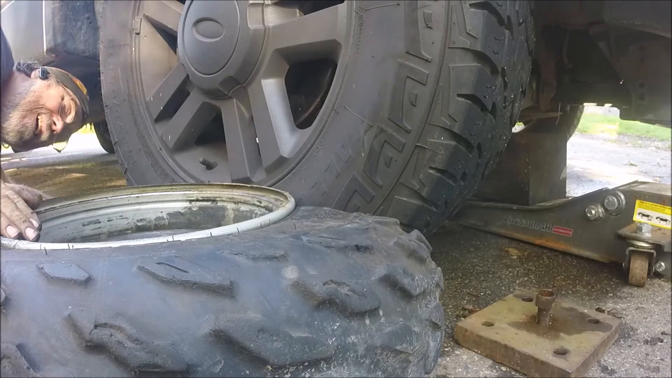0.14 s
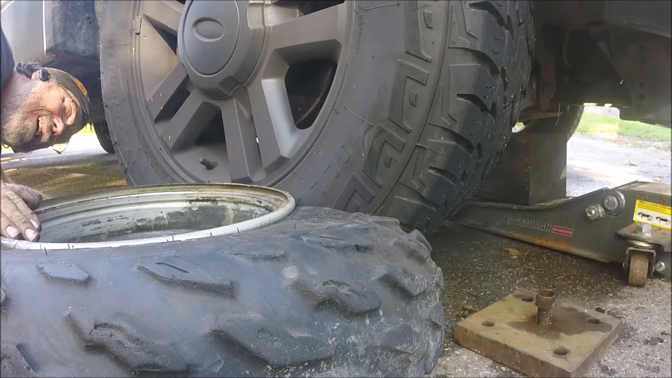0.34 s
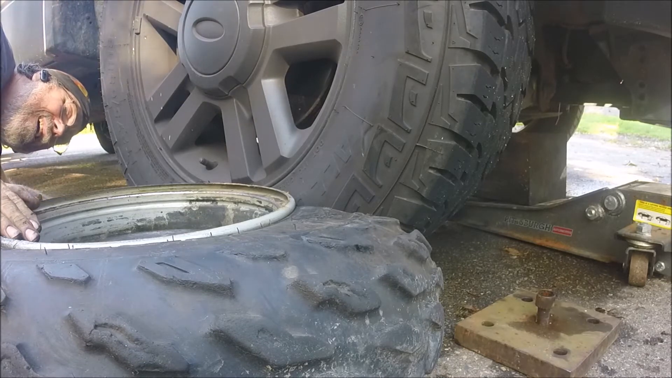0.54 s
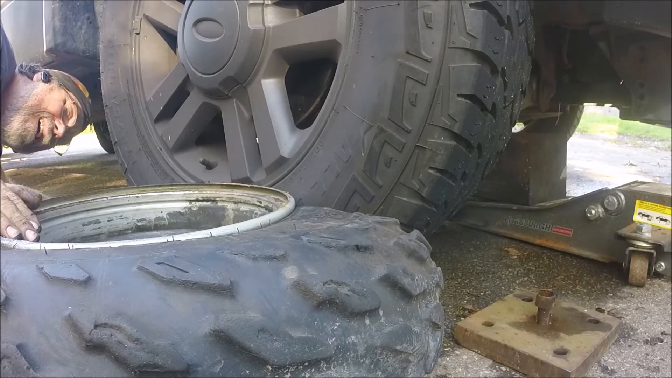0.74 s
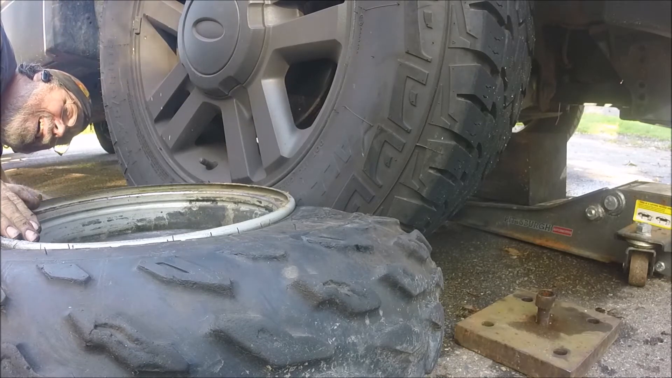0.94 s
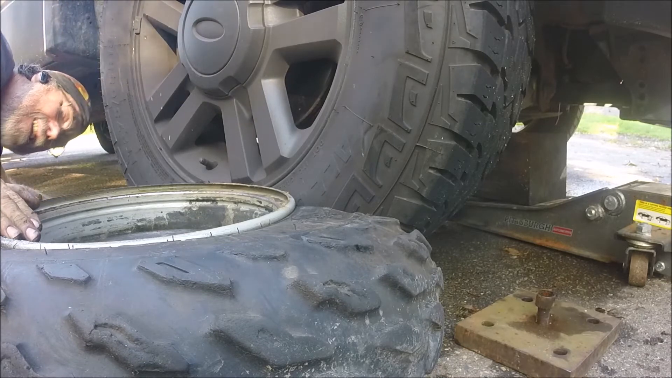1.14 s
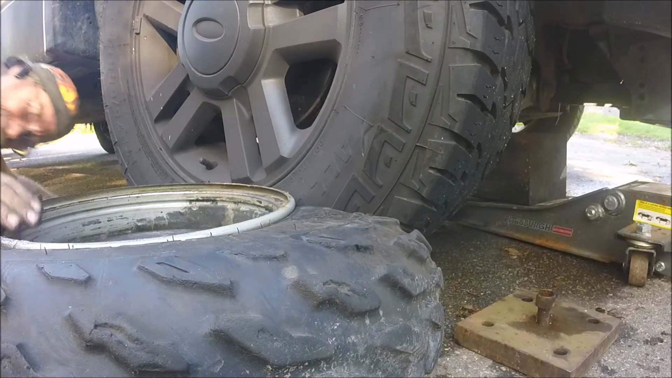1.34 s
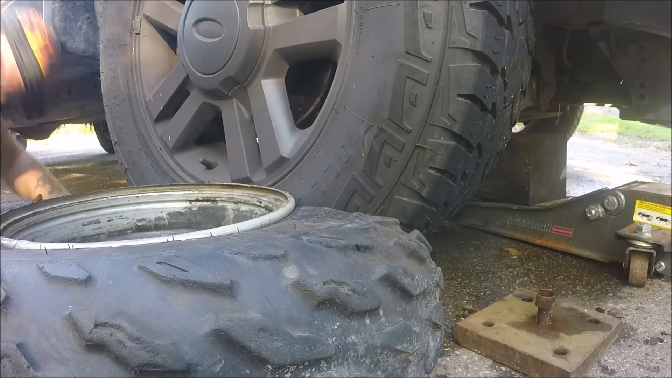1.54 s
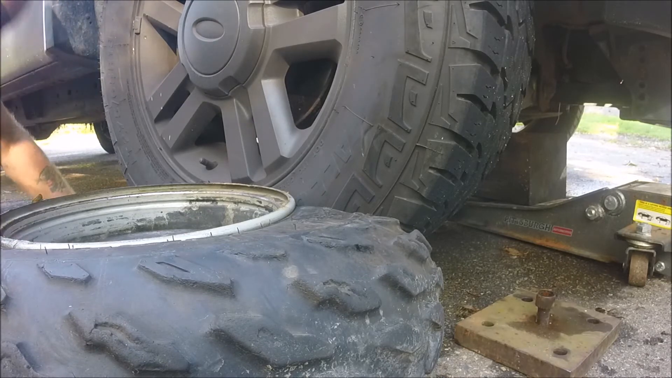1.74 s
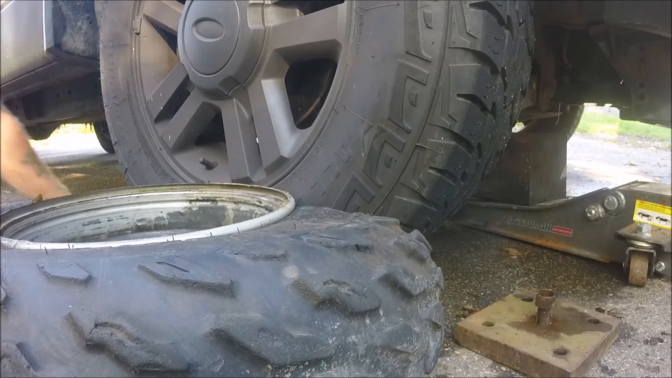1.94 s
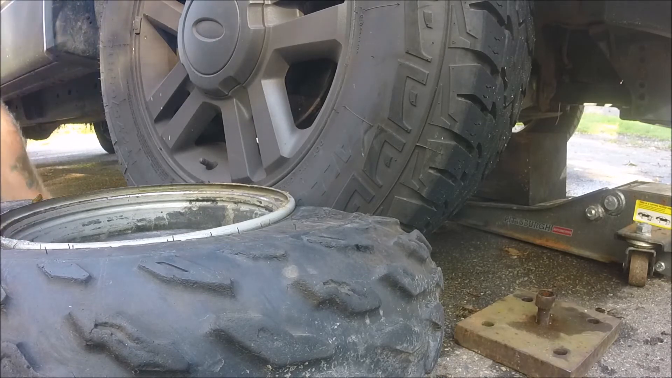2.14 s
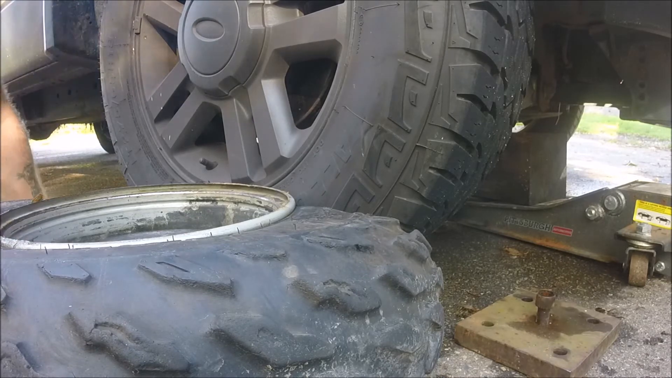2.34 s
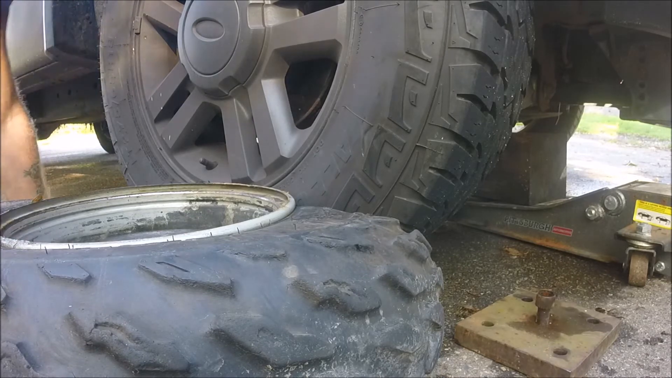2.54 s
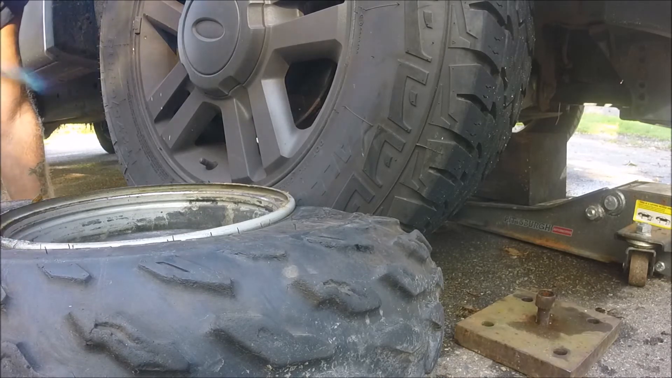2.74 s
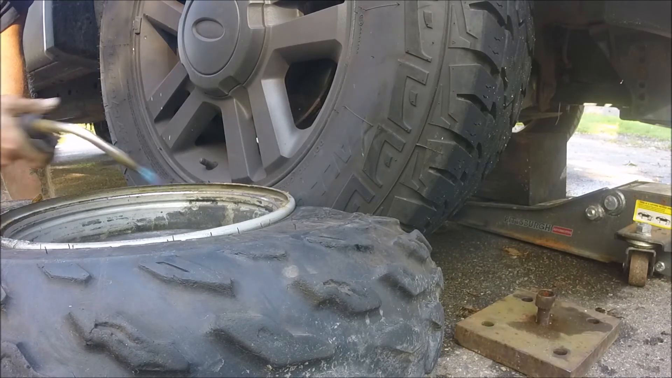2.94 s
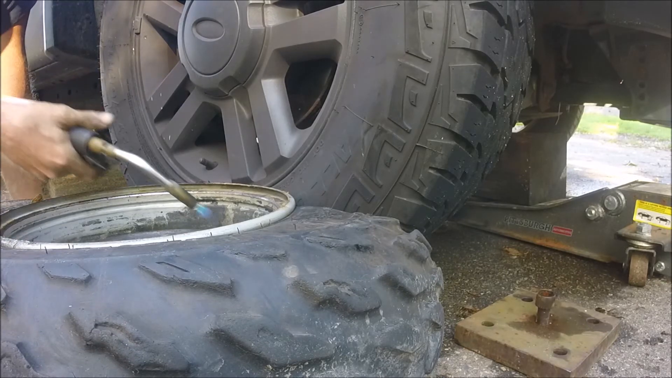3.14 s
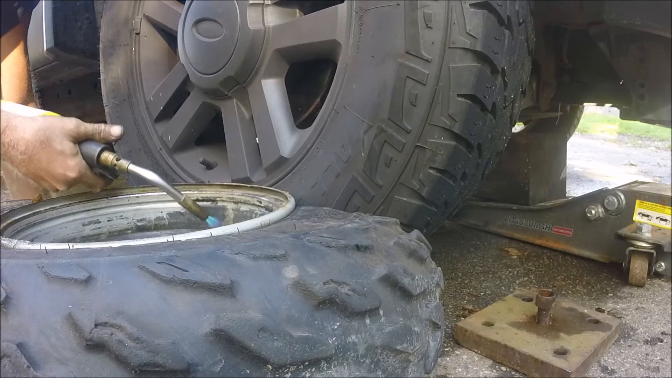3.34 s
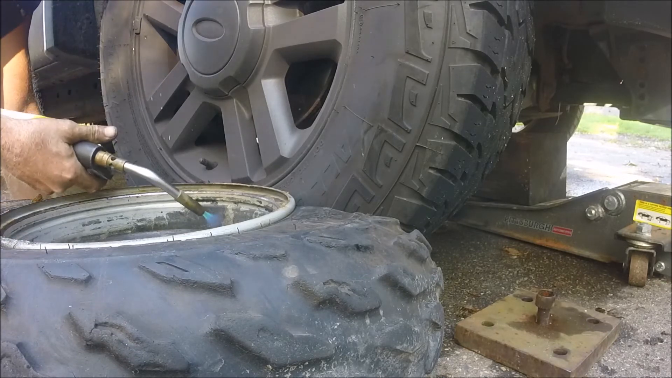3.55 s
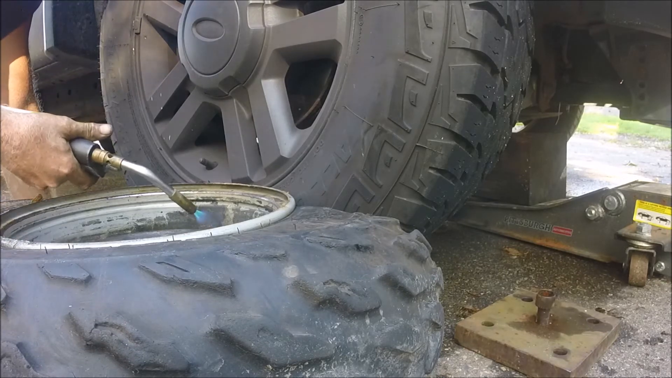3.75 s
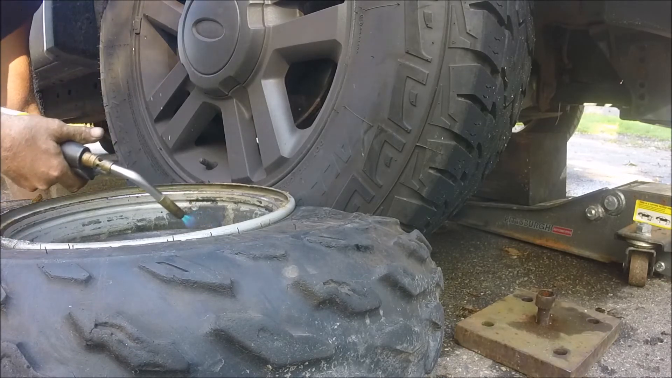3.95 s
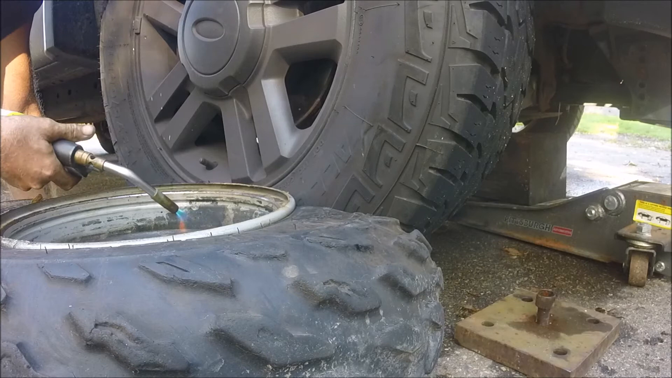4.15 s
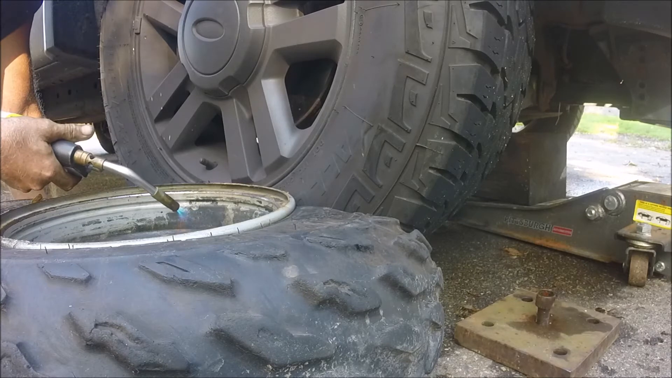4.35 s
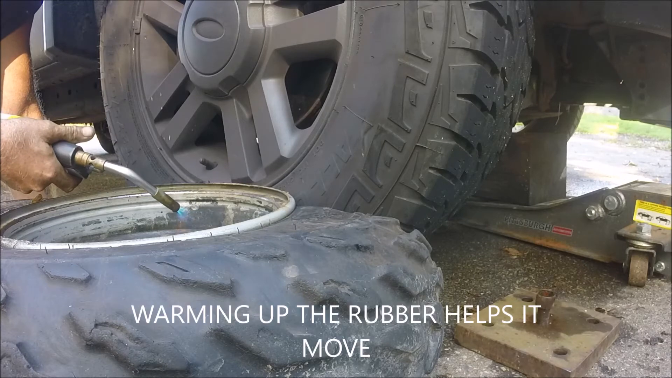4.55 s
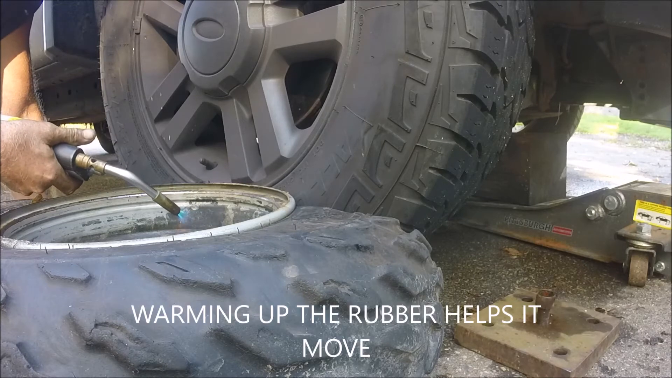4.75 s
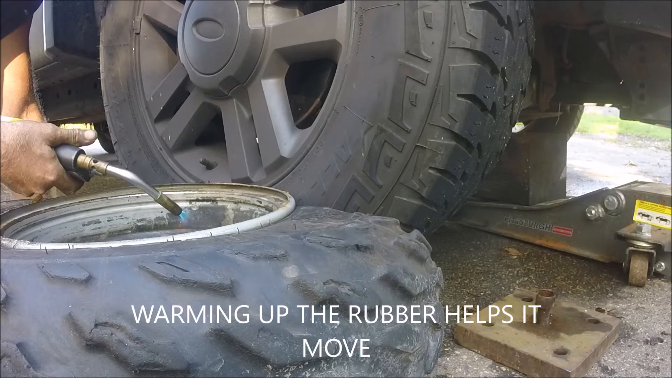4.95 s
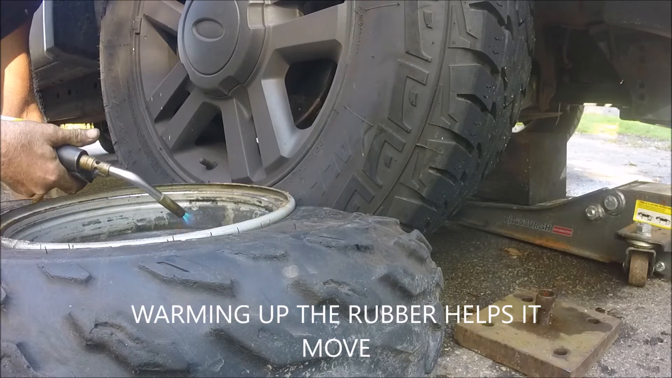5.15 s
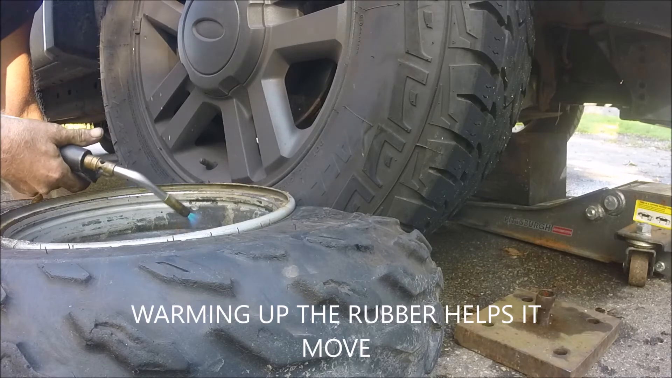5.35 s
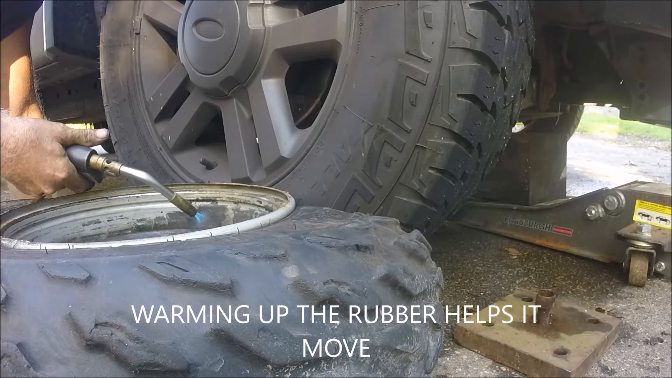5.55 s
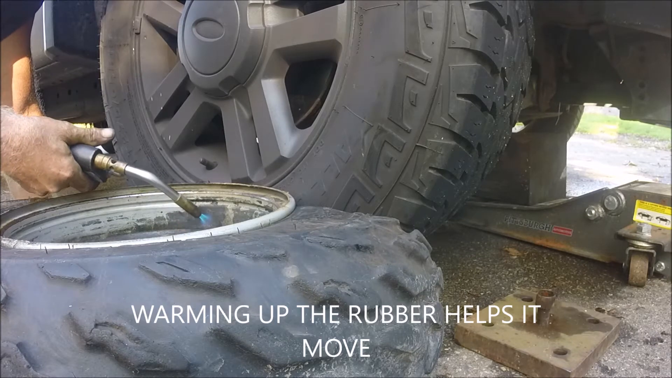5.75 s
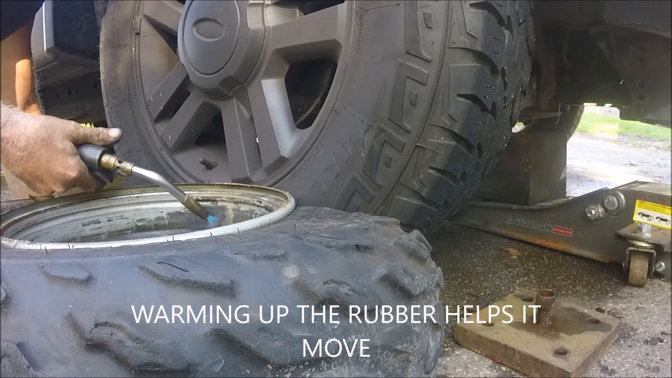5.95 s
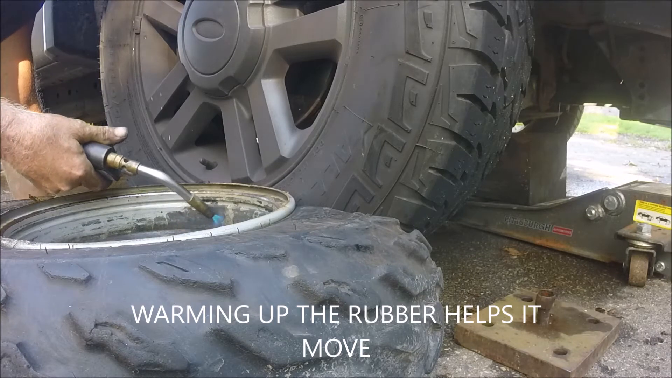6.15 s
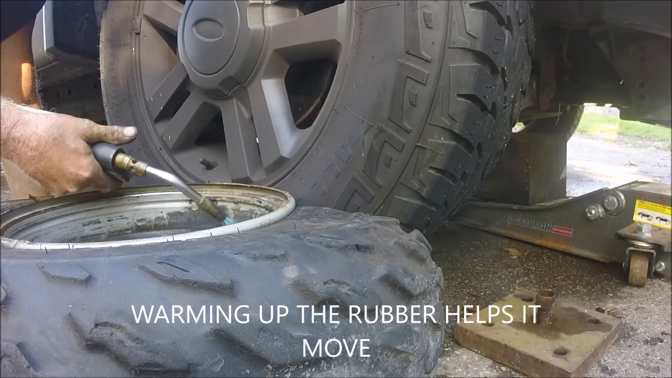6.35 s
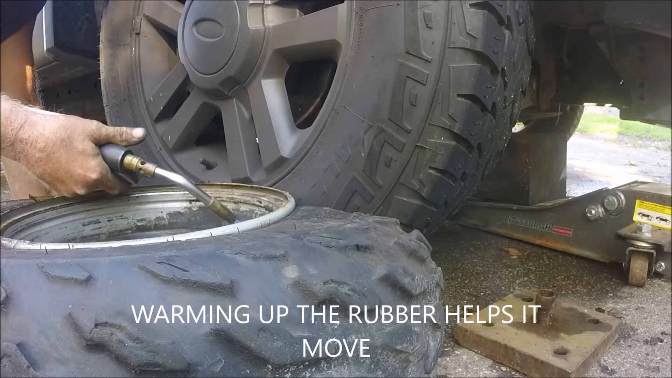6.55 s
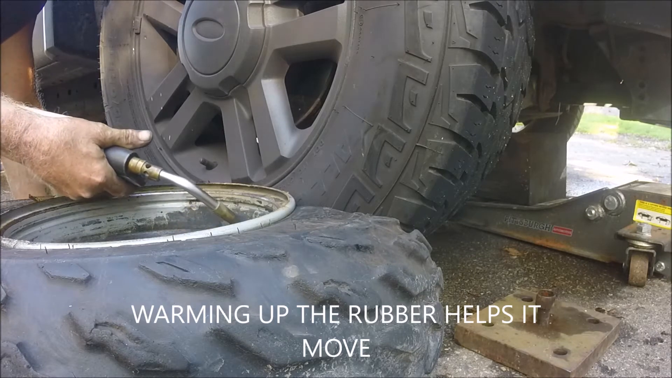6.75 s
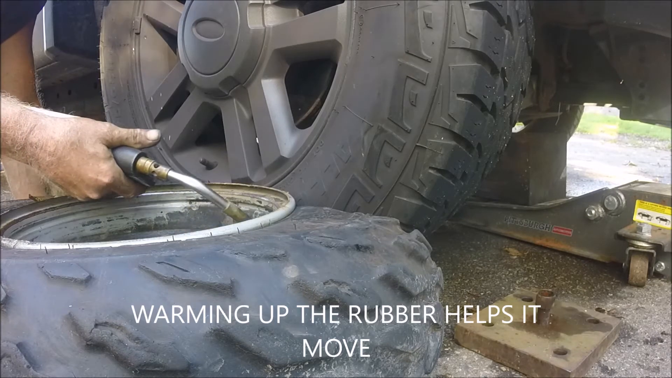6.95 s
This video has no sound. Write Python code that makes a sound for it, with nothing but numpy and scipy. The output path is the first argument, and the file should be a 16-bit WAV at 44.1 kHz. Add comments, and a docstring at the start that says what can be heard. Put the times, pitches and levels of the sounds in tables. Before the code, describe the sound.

A faint, low outdoor rumble lies under an open work area. At about 0.5 to 0.8 seconds there are soft scuffs, ticks and bumps as a handheld gas torch is picked up. A dull knock follows at 1.5 seconds and a small metallic clink at 2.2. At 2.6 gas briefly hisses, then the igniter snaps and the flame catches with a sharp pop. The flame flutters and whooshes as it swings, its howl leaping in pitch around 3 seconds. It then burns close and loud, a steady hissing roar with a hollow, airy, mid-pitched note. As the nozzle dips into a metal wheel rim, the tone shifts, becoming fuller and brighter from 4 to 5.5 seconds, with short surges of high fizz. From about 6 seconds it softens slightly, still burning at the end, near 7 seconds.

```python
"""A hand-held gas torch burns in an open workshop: turbulence roars, the burner tube howls near 1 kHz.
First it is picked up with bumps, scuffs and a clink; gas hisses, the igniter snaps, the flame pops alight.
It is then swung into the dish of a wheel rim on the floor, whose echoes comb the hiss.
As the nozzle dips, the flame brightens and peaks and dips shift in its hiss. Outside, a distant rumble."""
import sys
import numpy as np
from scipy import signal
from scipy.fft import rfft, irfft, next_fast_len
from scipy.io import wavfile
from scipy.ndimage import map_coordinates

SR = 44100
rng = np.random.default_rng(int(sys.argv[2]) if len(sys.argv) > 2 else 0)


def transcribe(signal):
    """Save signal, clipped to [-1, 1], as a 16-bit WAV file at the path in sys.argv[1]."""
    frames = np.atleast_2d(signal).T
    limited = np.clip(frames, -1, 1)
    pcm = np.round(limited * 32767).astype(np.int16)
    wavfile.write(sys.argv[1], SR, pcm)


N = 308024
TIME = np.arange(N) / SR


def torch(light_s=2.6632):
    """Gas flows, the igniter snaps, the gas pops; flame and howl then stand, coloured by the wheel."""
    lighting = unlit_gas() + igniter() + pop(light_s)
    burner = flame() + howl()
    burning = scatter(position_colour(rim_echoes(passing_echoes(burner))))
    lit = 1 - np.exp(-since(light_s) / 0.0013)
    return lighting + lit * burning


# Flame turbulence spectrum: f/Hz, level/dB
FLAME_SPECTRUM = [(40, -22.5), (100, -10), (200, -0.5), (420, -7), (800, 2), (1150, 0), (1500, -3.5),
                  (2500, -9.5), (5000, -21.5), (7500, -29), (12000, -41.5), (15000, -50)]

def flame(rumble_edge_hz=588, hiss_edge_hz=3260, flutter_db=1.0):
    """Turbulent burning gas: rumbles more on the wheel, brightens deep in the dish."""
    arrival, depth, _ = nozzle()
    flare_db, _ = flares()
    free_air = 1 - arrival ** 2
    rumble_db = -29 - 4 * free_air - 2 * depth
    roar_db = -28 - free_air + 3 * depth + flare_db
    hiss_db = -41 + 8 * depth ** 3 + 0.84 * flare_db
    hiss_db += 2 * swell(3.16, 0.2)  # nozzle turns towards the listener
    jet = noise(lambda hz: along(FLAME_SPECTRUM, hz))
    rumble = filtered(jet, lambda hz: below(hz, rumble_edge_hz))
    hiss = filtered(jet, lambda hz: 1 - below(hz, hiss_edge_hz))
    roar = jet - rumble - hiss
    burn = amp(rumble_db) * unit(rumble) + amp(roar_db) * unit(roar)
    burn += amp(hiss_db + 1.8 * wobble(13)) * unit(hiss)
    return (burn + fizz()) * amp(flutter_db * wobble(30))


# Swells of the jet's fizz: t/s, half-length/s, gain/dB
FIZZ_SWELLS = [(3.92, .14, 7), (4.513, .07, 17), (4.897, 0.11, 15), (5.076, 0.063, 13), (5.617, .17, 10),
               (6.848, 0.18, 5)]

def fizz(centre_hz=11400, width_hz=2800):
    """High fizz of the gas jet, weaker deep in the dish."""
    _, depth, _ = nozzle()
    surge_db = sum(db * swell(t_s, half_s) for t_s, half_s, db in FIZZ_SWELLS)
    level_db = -60 - 5 * depth ** 4 + surge_db + 0.54 * wobble(7)
    return amp(level_db) * noise(lambda hz: -20 * np.log10(1 + ((hz - centre_hz) / width_hz) ** 2))


def howl(wheel_hz=972, free_air_rise_hz=100, draught_rise_hz=329.6, draught_s=2.997):
    """Turbulence drives the tube's resonance; in the swing's draught it leaps and tears into a rush."""
    arrival, depth, _ = nozzle()
    _, flare_db = flares()
    draught = swell(draught_s, 0.052)
    level_db = -29 + 2.5 * depth + flare_db - 7 * draught
    pitch_hz = wheel_hz + free_air_rise_hz * (1 - arrival ** 4) + draught_rise_hz * draught
    rush = unit(amp(1.5 * wobble(90)) * airy_note(1360, width_hz=330))
    note = amp(level_db) * airy_note(pitch_hz, width_hz=80)
    return note + amp(-28) * swell(draught_s, 0.06) * rush


# Flares (+) and falters (-): t/s, half-length/s, flame/dB, howl/dB
FLAME_FLARES = [(2.691, 0.025, -4.5, -9), (2.787, 0.083, 0, 9), (2.94, 0.03, -1, 6.5), (3.035, 0.051, 3, 3),
                (3.12, 0.088, -0.5, 10.5), (3.285, 0.076, -1.5, 6), (3.467, 0.094, 0.5, 4),
                (3.707, 0.14, -4, -6.5), (3.843, 0.044, 3, 5), (4.473, 0.17, 1, 2.5), (4.76, 0.13, 1, 4),
                (5.82, 0.032, -2.5, -1), (5.972, 0.036, 4.5, 1), (6.157, 0.44, -3.5, -2.5),
                (6.98, 0.21, 0.5, -8)]

def flares():
    """The flame flares or falters briefly: gain curves in dB for flame and howl."""
    return sum(np.outer([flame_db, howl_db], swell(t_s, half_s))
               for t_s, half_s, flame_db, howl_db in FLAME_FLARES)


# Nozzle dip into the rim: t/s, depth (0 lip, 1 deep in the dish)
NOZZLE_DEPTH = [(3.05, 0.39), (3.3, 0.16), (3.5, 0.42), (3.8, 0.66), (4.17, 0.91), (4.4, 0.97), (5.1, 0.97),
                (5.3, 0.88), (5.62, 0.82), (5.8, 0.78), (6.05, 0.58), (6.3, 0.56), (6.45, 0.3), (6.7, 0.06),
                (6.98, 0.02)]

def nozzle(swing_s=3.02, swing_half_s=0.1505, lip_m=0.38, dish_m=0.28):
    """Hand motion: arrival at the wheel (0-1), depth in the rim (0-1), travel in metres."""
    arrival = (1 + np.tanh((TIME - swing_s) / swing_half_s)) / 2
    depth = np.interp(TIME, *np.transpose(NOZZLE_DEPTH))
    return arrival, depth, arrival * (lip_m + dish_m * depth)


# Rim reflection: f/Hz, gain/dB
RIM_REFLECTION = [(300, -37), (1000, -3), (6000, 4.5), (14000, 1)]
# Rim and tyre faces: best depth, depth span, delay/ms, slide/(ms per depth), gain (- inverts)
RIM_FACES = [(0.75, 1.6, 0.61, -0.462, -0.17), (0.72, 0.13, 0.517, -0.44, 0.16),
             (0.22, 0.36, 0.84, -0.11, 0.19), (0.02, 0.46, 0.697, -0.032, -0.1),
             (0.98, 0.78, 1.723, -0.27, 0.14), (0.57, 0.14, 1.62, -0.26, 0.2),
             (0.96, 0.26, 1.52, 0.051, -0.099), (0.6, 0.25, 2.34, -0.12, -0.13),
             (0.08, 0.1, 0.318, -0.12, 0.23), (0.14, 0.18, 1.084, -0.099, -0.15)]

def rim_echoes(x):
    """Each face of the wheel adds an echo; the combs slide with nozzle depth."""
    arrival, depth, _ = nozzle()
    echo = filtered(x, lambda hz: amp(along(RIM_REFLECTION, hz)))
    for best, span, delay_ms, slide_ms, gain in RIM_FACES:
        offset = depth - best
        delay_s = (delay_ms + slide_ms * offset) / 1000
        x = x + arrival * gain * bell(offset, span) * delayed(echo, delay_s)
    return x


# Surfaces swept past: t/s, half-length/s, delay/ms, slide/(ms/s), gain (- inverts)
PASSED_SURFACES = [(2.77, .08, 1.26, -.6, -.25), (2.78, .09, 1.13, -.6, .33), (2.78, .08, .64, -.2, .2),
                   (3.02, .1, .58, -.6, .22), (3.2, .07, .97, -.3, .26), (3.26, .11, .39, .15, .3)]

def passing_echoes(x):
    """Sliding echoes, each bouncing twice, comb the flame into a whoosh during the swing."""
    echo = filtered(x, lambda hz: amp(along(RIM_REFLECTION, hz)))
    power = 1
    for t_s, half_s, delay_ms, slide_ms_per_s, peak_gain in PASSED_SURFACES:
        gain = peak_gain * swell(t_s, half_s)
        delay_s = (delay_ms + slide_ms_per_s * (TIME - t_s)) / 1000
        x = x + gain * delayed(echo, delay_s) + gain ** 2 * delayed(echo, 2 * delay_s)
        power = power + gain ** 2
    return x / np.sqrt(power)


# Standing waves between wheel, floor and truck: f/Hz, width/Hz, gain/dB
STANDING_WAVES = [(261.5, 48.5, 8), (415, 31, -10), (514, 32, 6), (665, 45, 5), (1640, 35, 2),
                  (1770, 70, -7.5), (1945, 120, 4), (2373, 115, 6), (2797, 48, 5), (3210, 90, 5),
                  (3740, 200, 4.5), (3940, 70, -7), (4320, 360, 5), (5100, 270, 3)]
# Peaks and dips in the flame's hiss that shift with nozzle depth:
# best depth, depth span, f/Hz, slide/(Hz per depth), width/Hz, gain/dB
HISS_PEAKS_AND_DIPS = [(0.15, 0.55, 1190, 65, 91, -13.5), (0.78, 0.39, 1465, 354, 72, -12),
                       (0, 0.12, 1380, 0, 130, 4.5), (0.06, 0.5, 1800, 110, 56, 8.5),
                       (0.12, 0.12, 2180, -395, 155, -15.5), (0.68, 0.16, 2590, 71, 78, -16),
                       (0.85, 0.2, 2940, -498, 73, -7.5), (0.64, 0.25, 3330, -551, 170, -6),
                       (0, 0.1, 3340, 0, 200, 3), (0.96, 0.15, 3520, 525, 105, -10),
                       (0.49, 0.065, 3756, 98, 150, -15), (0.73, 0.19, 4400, -481, 87, -7.5),
                       (0.23, 0.17, 5050, -500, 180, 3), (0.07, 0.21, 5420, 226, 100, 9),
                       (0.43, 0.42, 6280, -44, 390, 5.5)]

def position_colour(x, reach_m=0.77):
    """Standing waves grow as the nozzle nears the wheel; peaks and dips in the hiss shift with depth."""
    hz, frame_s, spectrum = signal.stft(x, SR, nperseg=2048)
    hz = hz[:, None]
    arrival, depth, travel_m = (np.interp(frame_s, TIME, curve) for curve in nozzle())
    nearness = np.minimum(0.3 + travel_m / reach_m, 1)
    colour_db = nearness * sum(db * bell(hz - f_hz, width_hz) for f_hz, width_hz, db in STANDING_WAVES)
    for best, span, f_hz, slide_hz, width_hz, db in HISS_PEAKS_AND_DIPS:
        offset = depth - best
        centre_hz = f_hz + slide_hz * offset
        colour_db += db * arrival * bell(offset, span) * bell(hz - centre_hz, width_hz)
    return signal.istft(spectrum * amp(colour_db), SR, nperseg=2048)[1][:N]


def scatter(x, count=14, edge_hz=1700, sway_m=0.008, sound_m_per_s=343):
    """Spokes, jack and underbody reflect short waves; each detour shifts as the hand travels and sways."""
    _, _, travel_m = nozzle()
    treble = filtered(x, lambda hz: 1 - below(hz, edge_hz))
    echoes = np.zeros(N)
    for start_m, slant, polarity in rng.uniform([1.1, -0.6, -1], [4, 0.6, 1], (count, 3)):
        detour_m = start_m + slant * travel_m + sway_m * wobble(1.88)
        echoes += np.sign(polarity) * delayed(treble, detour_m / sound_m_per_s)
    share = 0.36 * (1 - travel_m / 2)  # direct sound dominates as the nozzle closes in
    return x + share * echoes / np.sqrt(count)


def pop(light_s, lag_s=0.0018, width_s=0.0012, low_cut_hz=60):
    """A puff of hot gas makes one pressure swing; the burner tube rings briefly."""
    u = (TIME - light_s - lag_s) / width_s
    pressure = amp(-9) * u * np.exp((1 - u ** 2) / 2)
    puff = filtered(pressure, lambda hz: 1j * hz / (low_cut_hz + 1j * hz))  # the puff's deepest bass is cut away
    return puff + amp(-7) * ring(light_s, hz=795, t60_s=0.0089, attack_s=0.00024)


# Igniter spectrum: f/Hz, level/dB
IGNITER_SPECTRUM = [(300, -16), (2500, 6), (6000, 0.5), (8000, -7), (11500, -5), (15000, -19.5)]

def igniter(spark_s=2.6603):
    """The igniter snaps and the underbody throws the snap back."""
    direct = amp(-19) * strike(spark_s, attack_s=0.00025, t60_s=0.018)
    reflected = amp(-31) * strike(spark_s, attack_s=0.0011, t60_s=0.11)
    return (direct + reflected) * noise(lambda hz: along(IGNITER_SPECTRUM, hz))


# Unlit gas spectrum: f/Hz, level/dB
GAS_SPECTRUM = [(300, -36), (900, 6), (1400, -16), (2300, 2), (2750, -24), (3500, 7), (4000, -22),
                (4800, 4), (8000, -10), (11000, -11), (15000, -31)]

def unlit_gas(valve_s=2.615):
    """The jet's own hiss: starts at the valve's opening, stands out in free air, fades at the wheel."""
    arrival, _, _ = nozzle()
    opening = (1 + np.tanh((TIME - valve_s) / 0.0031)) / 2
    return amp(-44.5) * opening * (1 - arrival) * noise(lambda hz: along(GAS_SPECTRUM, hz))


def seep():
    """A thin hiss of gas as the valve is eased open."""
    return amp(-72) * swell(2.53, 0.12) * airy_note(6600, width_hz=380)


# Handling bumps: t/s, level/dB, f/Hz, t60/s
HANDLING_BUMPS = [(0.537, -41, 1450, 0.035), (0.664, -39, 247, 0.07), (0.665, -34.5, 547, 0.021),
                  (0.667, -43, 820, 0.04), (1.537, -26.5, 221, 0.022), (2.596, -34.5, 1030, 0.02)]

def bumps():
    """Soft knocks as the torch is fetched, one damped mode each."""
    return sum(amp(db) * ring(t_s, hz, t60_s, attack_s=0.0003) for t_s, db, hz, t60_s in HANDLING_BUMPS)


# Hand and clothing scuffs: t/s, level/dB, half-length/s, f/Hz, width/octaves
HAND_SCUFFS = [(0.48, -58, 0.019, 1900, 0.67), (0.575, -58, 0.044, 1780, 0.5),
               (0.67, -53, 0.031, 885, 1.14), (0.69, -51.5, 0.044, 300, 0.67),
               (0.697, -63.5, 0.11, 2400, 1.65), (0.75, -61, 0.027, 2000, 0.7),
               (1.565, -51, 0.013, 700, 0.89), (1.562, -52.5, 0.0088, 5400, 0.4),
               (1.576, -57, 0.015, 8300, .6)]

def scuffs(scratch_db=4.0, scratch_rate_hz=260):
    """Hand and clothing rub: short swells of scratchy band noise."""
    out = np.zeros(N)
    for t_s, db, half_s, centre_hz, octaves in HAND_SCUFFS:
        rub = noise(lambda hz: -20 * np.log10(1 + (np.log2((hz + 1) / centre_hz) / octaves) ** 4))
        scratch = amp(scratch_db * wobble(scratch_rate_hz))
        out += amp(db) * swell(t_s, half_s) * unit(rub * scratch)
    return out


# Rustle ticks: t/s, level/dB
RUSTLE_TICKS = [(0.629, -56), (0.646, -51), (0.666, -46), (0.679, -54), (0.721, -50), (0.757, -51),
                (1.554, -47)]
# Tick spectrum: f/Hz, level/dB
TICK_SPECTRUM = [(300, -12), (1500, 2), (4000, -4), (8000, -13), (15000, -20)]

def ticks():
    """The handling rustle catches in tiny noise bursts."""
    envelope = sum(amp(db) * strike(t_s, attack_s=0.0004, t60_s=0.015) for t_s, db in RUSTLE_TICKS)
    return envelope * noise(lambda hz: along(TICK_SPECTRUM, hz))


# Bottle contacts: t/s, level/dB
BOTTLE_HITS = [(2.203, -59), (2.219, -40.5)]
# Bottle modes: f/Hz, level/dB, t60/s
BOTTLE_MODES = [(2750, 5.5, 0.037), (2780, -11, 0.23), (3100, -14, .08), (6250, -13, .04), (7900, -2, 0.03),
                (10600, -4, 0.035)]
# Steel-on-steel spectrum: f/Hz, level/dB
CONTACT_SPECTRUM = [(300, -16), (1800, 2), (2700, 5), (4500, -2), (8000, -2), (9500, 0), (10700, 3),
                    (12500, -5), (14000, -1), (15400, -12)]

def clink():
    """The gas bottle touches metal: a dry click and ringing steel modes."""
    out = np.zeros(N)
    for t_s, hit_db in BOTTLE_HITS:
        steel = sum(amp(db) * ring(t_s, hz, t60_s, attack_s=0.0014) for hz, db, t60_s in BOTTLE_MODES)
        contact = noise(lambda hz: along(CONTACT_SPECTRUM, hz))
        click = amp(3) * strike(t_s, attack_s=0.003, t60_s=0.055) * contact
        out += amp(hit_db) * (steel + click)
    return out


# Outdoor background spectrum: f/Hz, level/dB
YARD_SPECTRUM = [(15, -39), (25, -8.5), (106, 0.5), (176, -10), (213, -8.5), (271, -14.5), (383, -14.5),
                 (450, -16.5), (501, -18.5), (1310, -22.5), (1420, -23.5), (3180, -30), (15000, -49)]

def yard():
    """Distant rumble and air from outside."""
    return amp(-50) * noise(lambda hz: along(YARD_SPECTRUM, hz))


def amp(db):
    """Decibels to gain."""
    return 10 ** (np.asarray(db) / 20)


def unit(x):
    """x scaled to rms 1."""
    return x / np.sqrt(np.mean(x ** 2) + 1e-20)


def along(points, hz):
    """Interpolate (Hz, value) points on a log axis."""
    points_hz, values = np.transpose(points)
    return np.interp(np.log(hz + 1), np.log(points_hz + 1), values)


def below(hz, edge_hz):
    """Gain of a steep low-pass."""
    return 1 / (1 + (hz / edge_hz) ** 8)


def filtered(x, response):
    """x through the gain response(Hz)."""
    size = next_fast_len(N + 8192)
    return irfft(rfft(x, size) * response(np.fft.rfftfreq(size, 1 / SR)), size)[:N]


def delayed(x, delay_s):
    """x after a delay that may vary per sample."""
    return map_coordinates(x, [(TIME - delay_s) * SR], order=2)


def noise(colour_db):
    """Noise of rms 1 with spectral shape colour_db(Hz)."""
    return unit(filtered(rng.standard_normal(N), lambda hz: amp(colour_db(hz))))


def airy_note(pitch_hz, width_hz):
    """A noise band of rms 1 around a steady or moving pitch."""
    sway = lambda: noise(lambda hz: -10 * np.log10(1 + (hz / width_hz) ** 4))
    phase = 2 * np.pi * np.cumsum(np.broadcast_to(pitch_hz, N)) / SR
    return sway() * np.cos(phase) + sway() * np.sin(phase)


def wobble(rate_hz):
    """A smooth random curve, rate_hz knots a second."""
    return map_coordinates(rng.standard_normal(int(N * rate_hz / SR) + 4), [TIME * rate_hz])


def bell(offset, width):
    """Gaussian of height 1."""
    return np.exp(-(offset / width) ** 2)


def swell(t_s, half_s):
    """A smooth bump of height 1 around t_s."""
    return bell(TIME - t_s, half_s)


def since(t_s):
    """Seconds since t_s, zero before."""
    return np.maximum(TIME - t_s, 0)


def strike(t_s, attack_s, t60_s):
    """An envelope that rises at t_s and dies away."""
    age_s = since(t_s)
    return (1 - np.exp(-age_s / attack_s)) * amp(-60 * np.minimum(age_s / t60_s, 10))


def ring(t_s, hz, t60_s, attack_s):
    """One damped mode set off at t_s."""
    return strike(t_s, attack_s, t60_s) * np.sin(2 * np.pi * hz * since(t_s))


def scene():
    """Torch, handling and background, in mono."""
    return (seep() + torch() + bumps() + scuffs() + ticks() + clink() + yard())[None]


def record(dry):
    """Band limit at 15.4 kHz."""
    return filtered(dry[0], lambda hz: hz < 15400)[None]


dry = scene()
out = record(dry)
transcribe(out)
```